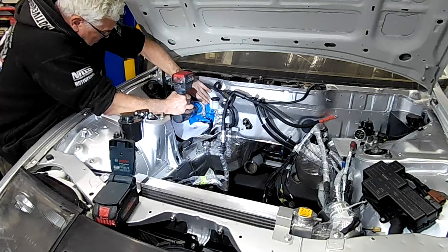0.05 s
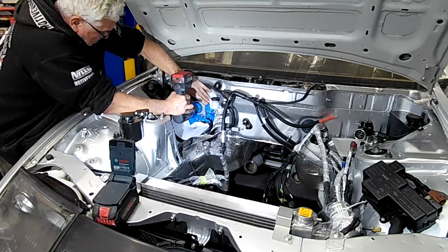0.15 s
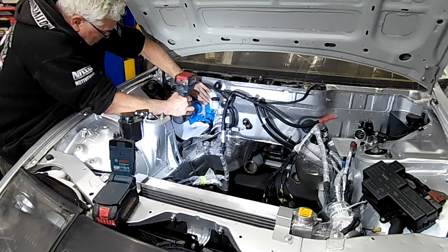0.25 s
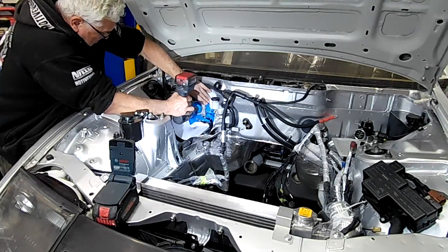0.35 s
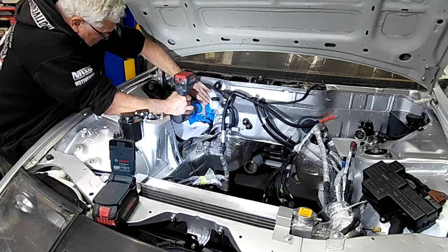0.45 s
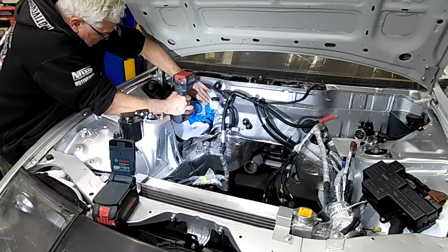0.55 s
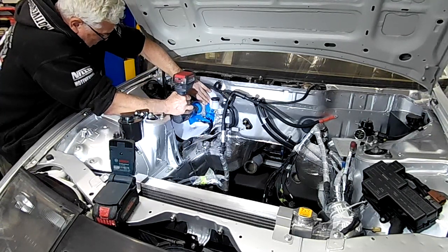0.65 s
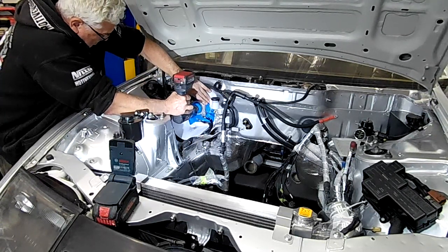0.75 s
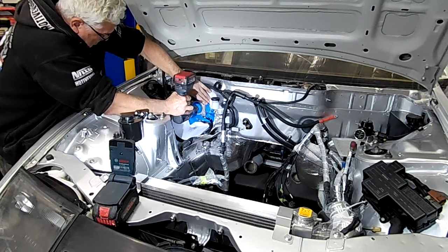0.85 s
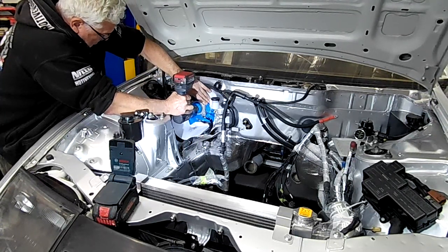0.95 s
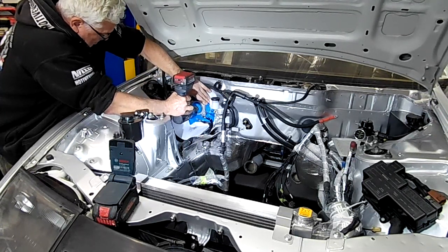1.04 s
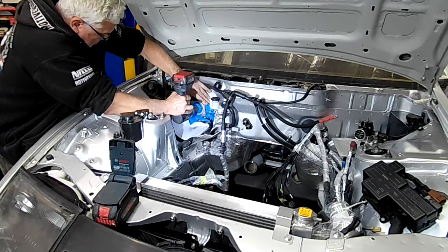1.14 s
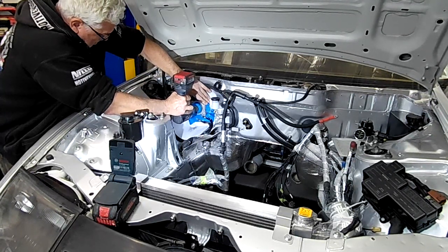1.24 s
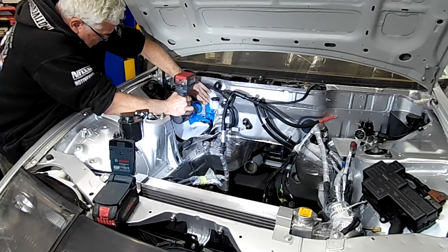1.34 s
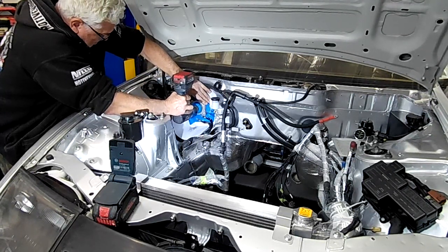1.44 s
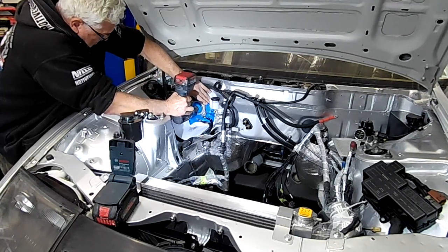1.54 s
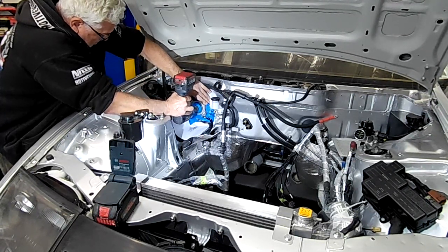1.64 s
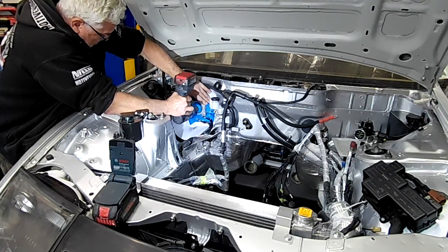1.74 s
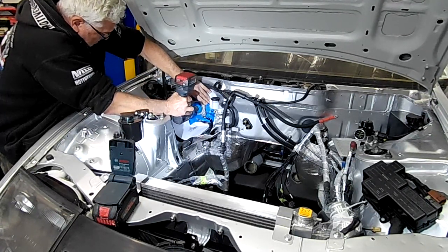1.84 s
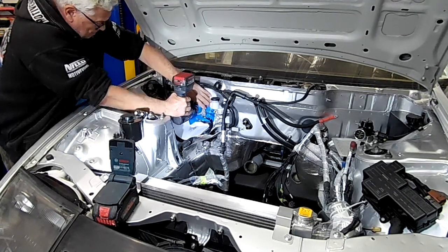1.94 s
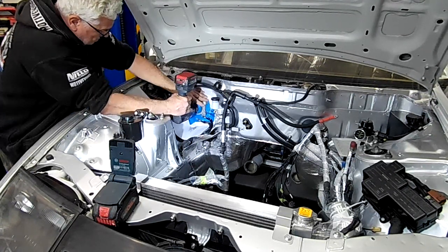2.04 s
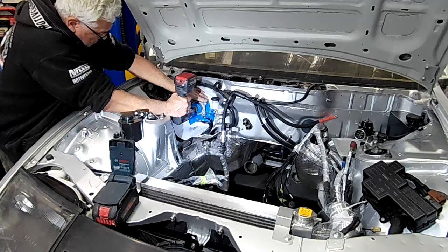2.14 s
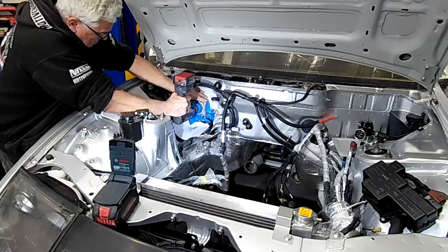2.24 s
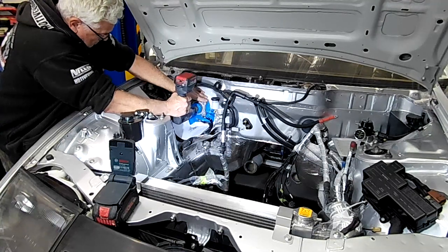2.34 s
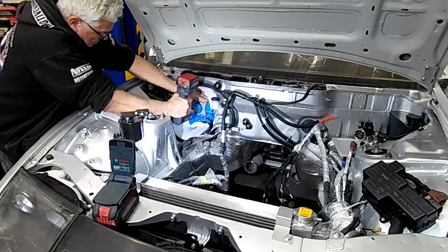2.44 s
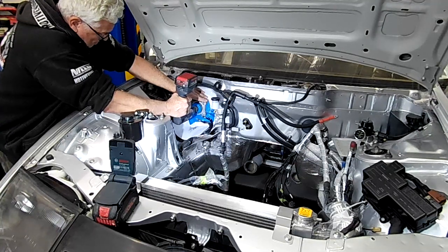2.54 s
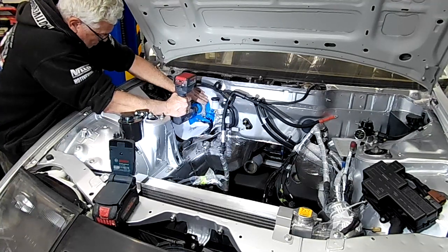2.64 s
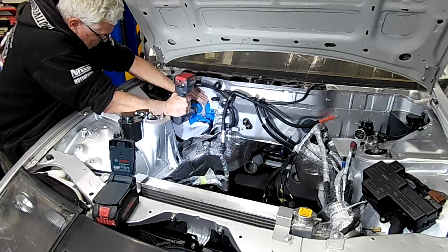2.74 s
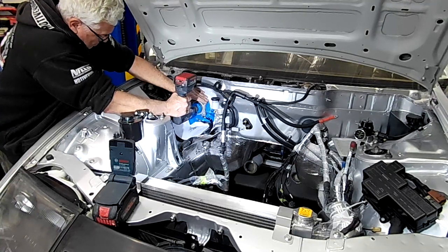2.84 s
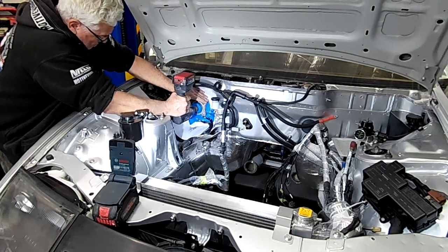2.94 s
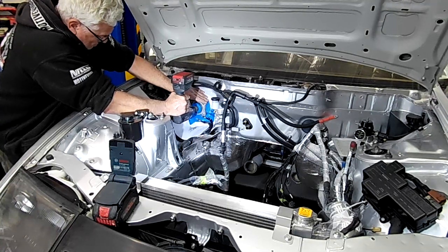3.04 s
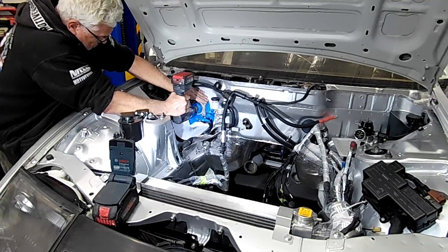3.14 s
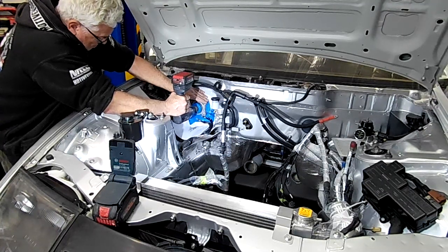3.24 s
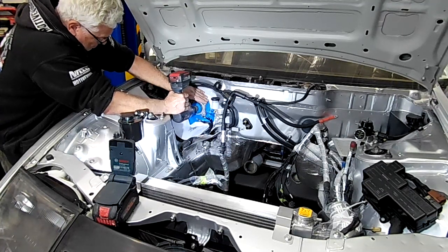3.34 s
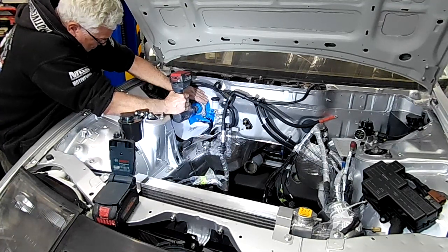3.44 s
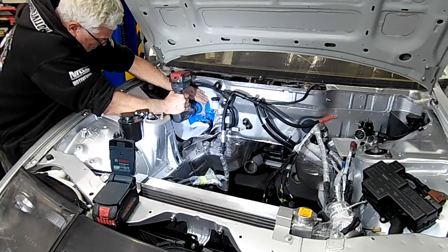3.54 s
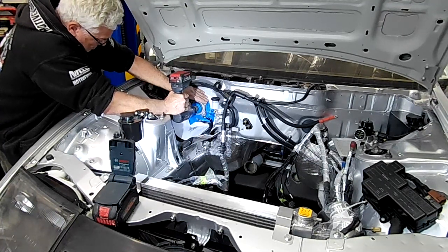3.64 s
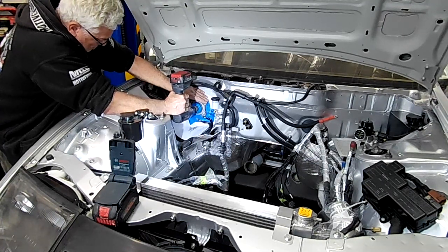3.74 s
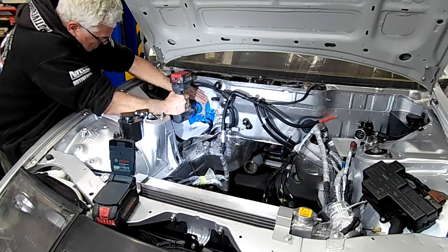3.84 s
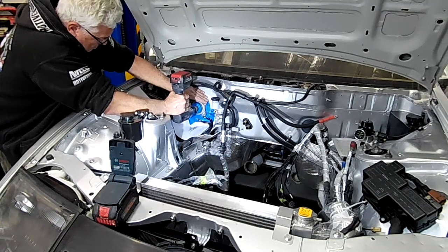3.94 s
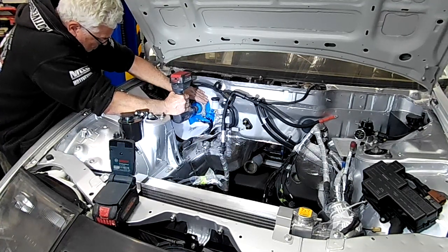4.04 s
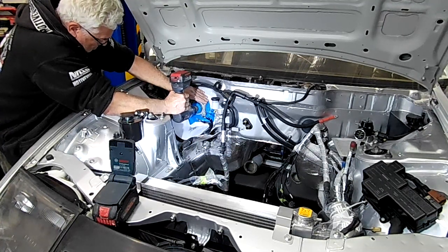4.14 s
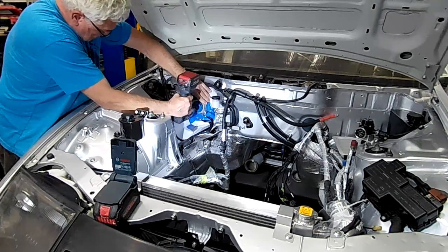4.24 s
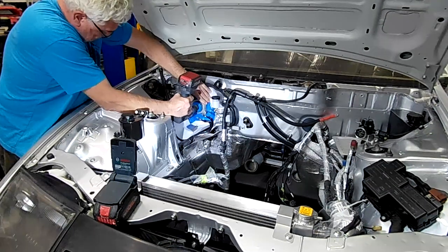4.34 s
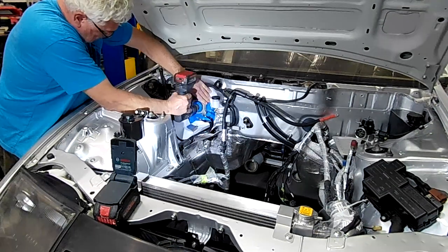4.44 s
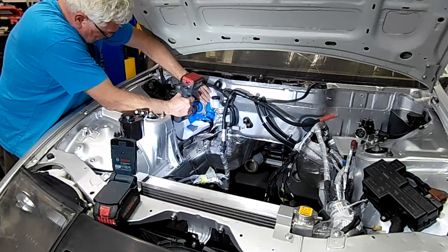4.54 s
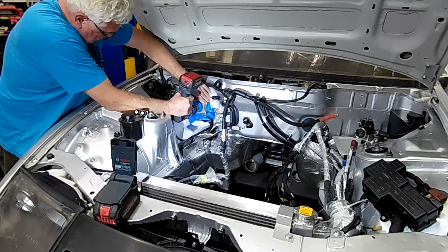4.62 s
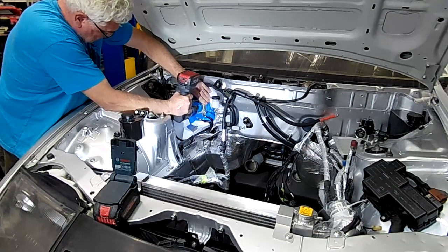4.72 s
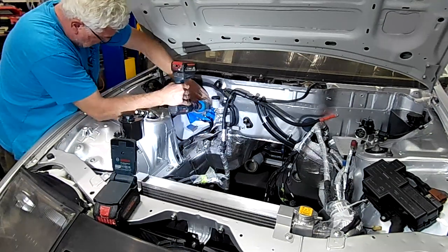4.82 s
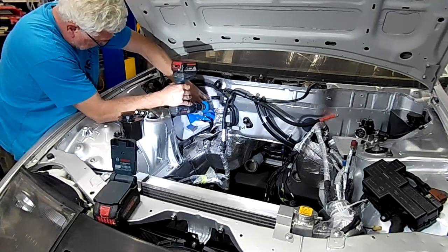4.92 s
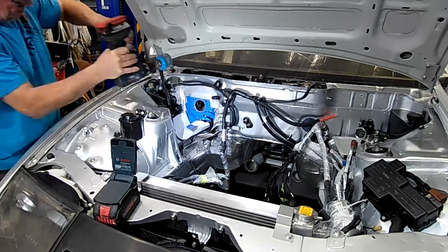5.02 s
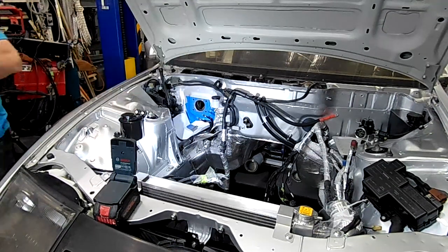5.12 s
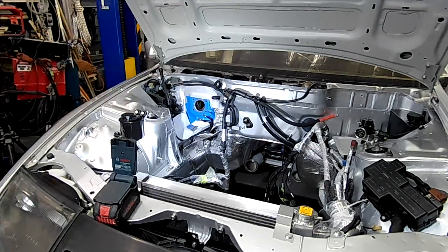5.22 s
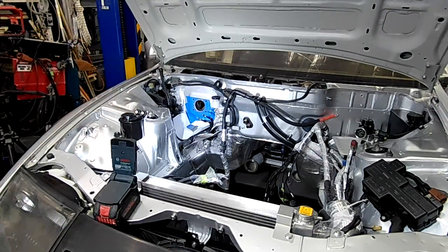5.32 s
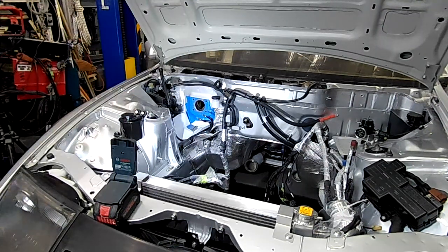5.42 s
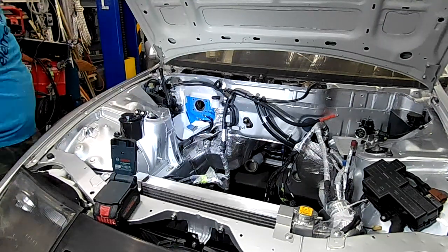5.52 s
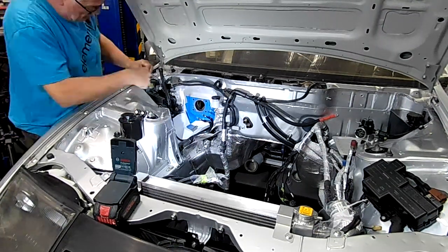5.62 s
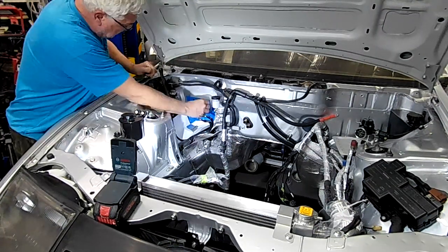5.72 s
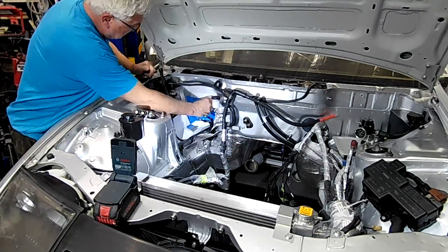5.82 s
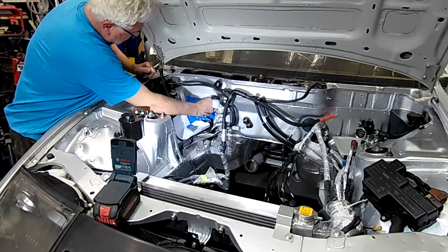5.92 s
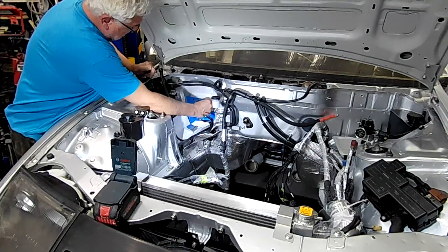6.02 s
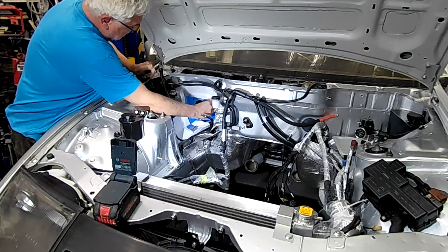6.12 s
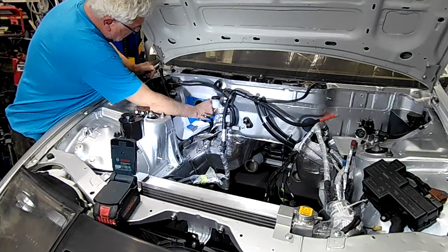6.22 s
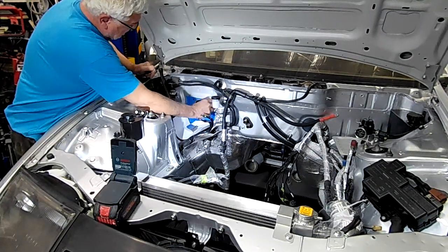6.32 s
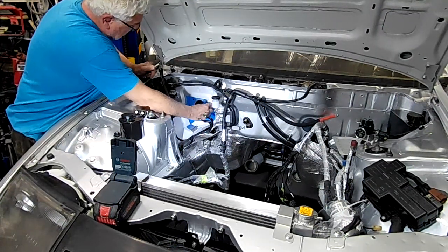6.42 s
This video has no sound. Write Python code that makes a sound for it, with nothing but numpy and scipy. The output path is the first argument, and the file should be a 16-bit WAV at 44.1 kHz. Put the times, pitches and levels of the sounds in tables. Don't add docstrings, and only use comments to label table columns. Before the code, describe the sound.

Harsh, rattling metal cutting from a hand drill stops, restarts with a brief squeal, breaks through in jerks, and gives way to faint clicks.

```python
import sys
import numpy as np
from scipy import signal
from scipy.io import wavfile
from scipy.ndimage import uniform_filter1d

SR = 44100
rng = np.random.default_rng(int(sys.argv[2]) if len(sys.argv) > 2 else 0)


def volts(x):
    e = np.asarray(x, float) / 20
    return 10 ** e


def wav_record(signal):
    frames = np.transpose(np.atleast_2d(signal))
    bounded = np.clip(frames, -1, 1)
    quanta = np.round(bounded * 32767).astype(np.int16)
    wavfile.write(sys.argv[1], SR, quanta)


N = 285322

# [t/s, effort level/dB, bite level/dB (shriek of the teeth)]
BURSTS = [
    [(0.0, -38, -6), (0.096, -40.5, -.5), (0.29, -34, -6.5), (0.434, -39.5, -3), (0.5, -37.5, -4.5),
     (0.98, -38.5, .3), (1.488, -39, 2), (1.902, -41, 4.3), (1.921, -52, -2)],
    [(2.138, -54, 2.2), (2.16, -45.5, 2.2), (2.398, -39.5, -1), (2.451, -44, 2)],
    [(2.449, -66, 2.2), (2.462, -46, -4), (2.474, -43.5, 3), (2.86, -39, -.6), (2.968, -40.5, .4),
     (3.34, -39, -2.5)],
    [(3.33, -42, -.9), (3.414, -38.5, -5), (3.79, -39.5, -.2), (4.188, -36, -5), (4.236, -40, -2.2),
     (4.249, -58, -2.2)],
    [(4.326, -50.5, 1.2), (4.476, -51.5, 4), (4.774, -53, 4.5), (4.838, -60, 3)],
    [(4.937, -50, -1.5), (4.943, -40, -1.5), (4.956, -63, 10.5)],
    [(4.953, -56, 7), (4.973, -46.5, 1.2), (4.99, -73, 1.2)],
]
CONTACTS = [0, 1, 1, 2, 3, 3, 3]
# [t/s, speed/turns per second]
SAW_SPEED = [(0, 53.3), (.4, 54.6), (1, 53), (1.52, 53.6), (1.58, 47), (1.72, 43.5), (1.93, 43), (2.14, 56),
             (2.5, 53), (2.8, 52.4), (3.3, 53.5), (3.6, 53.2), (3.85, 52.3), (4.25, 52.3), (4.4, 56)]
PART_EDGES = [450, 1600, 6800, 10000, 17000]
# [drum level/dB, panel level/dB, cup level/dB, teeth level/dB]
PART_LEVELS = [(-20, 0, 1.2, 0), (-15.5, 0, 1.5, 0), (-15.5, 0, 1.1, 0), (-21, 0, -.6, 0)]
BITE_FOLLOW = [.1, 0, .7, 1]
REPEAT_SHARE = [0.6, 0.48, 0.085, 0.26]
BITE_DEPTH = [.6, 1.05, .9, .9]
# [t/s, level/dB under the effort, f/Hz, length/s]
BOOMS = [
    (.17, -29, 350, .28),
    (.05, -24, 930, .33),
    (3.15, -26, 630, .2),
    (1.0, -31, 800, .92),
    (2.15, -18, 1020, .3),
    (3.32, -20.5, 790, .57),
    (4.13, -20, 900, .12),
]
# [multiple of saw speed, level/dB under the panel in each of four contacts]
GEAR_TONES = [(12, -41, -41, -38, -45), (14, -43, -41, -35, -45), (16, -42, -41, -31, -45),
              (25, -39, -26, -33, -40), (36, -22, -22, -30, -35), (38, -24.5, -16, -22, -26),
              (40, -21, -20, -29, -36), (42, -23.5, -19, -20, -35), (52, -23.5, -14, -29, -35),
              (58, -21, -22, -22, -30)]
# [multiple of saw speed, level/dB under the effort]
GEAR_SONG = [(25, -29), (40, -18), (42, -12), (54, -14), (55, -18), (60, -17), (68, -20), (73, -19),
             (74, -13), (78, -18), (82, -12), (83, -18)]


def cutting(rows, contact):
    s, t, (effort_db, bite_db) = columns(rows)
    count = len(t)
    levels_db = [effort_db + part_db + follow * bite_db
                 for part_db, follow in zip(PART_LEVELS[contact], BITE_FOLLOW)]
    turns = np.cumsum(np.interp(t, *np.transpose(SAW_SPEED))) / SR

    tick_size = volts(4.64 * np.minimum(rng.exponential(1, count), 3.4))
    ticks = tick_size * (rng.random(count) < 3000 / SR)
    ticks = evened(ticks * rng.choice([-1, 1], count))
    chips = evened(rng.standard_normal(count) + 0.45 * ticks)
    fresh = panel(chips, contact)
    again = panel(repeating(turns, memory=0.86), contact)

    out = np.zeros(count)
    for lo, hi, db, share in zip(PART_EDGES, PART_EDGES[1:], levels_db, REPEAT_SHARE):
        rung = band(np.sqrt(1 - share) * fresh + np.sqrt(share) * again, lo, hi)
        bitten = rung * bites(turns, rng.uniform(0, 0.15)) ** BITE_DEPTH[contact]
        out += volts(db + 0.89 * slow(count, 29.94)) * evened(bitten)

    boom_rise_s, boom_width = 0.06, 1.27
    for start, db, hz, length in BOOMS:
        swell = np.clip(np.minimum(t - start, start + length - t) / boom_rise_s, 0, 1)
        boom = evened(band(fresh + again, hz / boom_width, hz * boom_width, order=2))
        out += volts(effort_db + db) * swell * boom

    for multiple, *dbs in GEAR_TONES:
        waver_db = 2.5 * slow(count, 4)
        out += volts(levels_db[1] + dbs[contact] + waver_db) * np.sin(2 * np.pi * multiple * turns)

    sing_from_s, sing_to_s, sing_rise_s = 3.76, 4.3, 0.12
    sings = np.clip(np.minimum(t - sing_from_s, sing_to_s - t) / sing_rise_s, 0, 1)
    if sings.any():
        for multiple, db in GEAR_SONG:
            level = sings * volts(effort_db + db + 2.6 * slow(count, 7))
            out += level * np.sin(2 * np.pi * (multiple * turns + rng.random()))

    shake = evened(band(rng.standard_normal(count), 22, 90, order=2))
    out += volts(effort_db - 54 + 4 * slow(count, 9)) * shake
    edge = np.minimum(np.minimum(t - t[0] + (s == 0), t[-1] - t) / 0.012, 1)
    return s, patchy(out, patchy_db=1.5) * np.sin(np.pi / 2 * edge)


def bites(turns, lead):
    halves = 2 * (turns + lead)
    whole = halves.astype(int)
    bite_db = 2 * np.clip(rng.standard_normal(whole[-1] + 1), -2, 1.4)[whole] - 9.2 * (whole % 2)
    curl = volts(1.43 * slow(len(turns), 220))
    return curl * (1.38 + volts(bite_db) * np.exp(-((halves % 1 - 0.45) / 0.22) ** 2))


def repeating(turns, memory):
    burrs = rng.standard_normal((int(turns[-1]) + 40, 800))
    worn = signal.lfilter([1], [1, -memory], burrs, axis=0)[30:]
    return evened(worn.ravel()[(turns * 800).astype(int)])


# [f/Hz, width/Hz, level/dB in each of four contacts]
PANEL_MODES = [(647, 110, -20, -27, -19, -23), (847, 140, -24, -22, -17, -24),
               (1299, 134, -12.5, -13.5, -4, -17), (1958, 136, -4, -7, -9.5, -5.5),
               (2077, 62, -4, -19, -6, -23), (2457, 115, -6.5, -9, -6.5, -21),
               (2840, 440, -2, -2.5, -4, -3.5), (3070, 150, 3.5, -1.5, 0, 3),
               (3574, 118, -2, -17.5, -6.5, -10.5), (3840, 110.5, -4.5, -8.5, -2, -10.5),
               (4372, 410, -4, -8, -3, -8), (5166, 250, -5, -5, -6.5, -11.5),
               (5876, 400, -9, -7, -10, -10.5)]
# [f/Hz, width/Hz, level/dB in each of four contacts]
CUP_MODES = [(6550, 240, -15.5, -14.5, -15.5, -13), (7720, 410, 2.5, -4.5, -5, -7),
             (8340, 300, -3.5, -6.5, -7, -14), (8750, 300, 3.5, -2.5, -6.5, -11),
             (9310, 266, -1.5, -8, -4, -7.5), (10540, 290, -5, 0, -1.5, -4.5),
             (11170, 260, -5.5, -3, -4.5, -2.5), (11890, 650, -11.5, 0, -1.5, -4),
             (12400, 400, -5, -4, -5, -1), (13600, 387, -11.5, -7.5, -4, -3), (14700, 480, -6, 1, -1, -.5),
             (15700, 660, -11.5, -4.5, -4, -9)]
# [f/Hz, level/dB]
BETWEEN_MODES = [(300, -55), (600, -31.5), (1500, -16.5), (2300, -13.5), (3340, -16), (6500, -18),
                 (10000, -9.5), (14000, -15)]


def panel(x, contact):
    modes = [(hz, width, dbs[contact]) for hz, width, *dbs in PANEL_MODES + CUP_MODES]
    return body(x, BETWEEN_MODES, modes)


def patchy(x, patchy_db):
    z = signal.stft(x, nperseg=512, noverlap=384)[2]
    patches = rng.standard_normal(z.T.shape).T
    patches = uniform_filter1d(patches, size=4, axis=0)
    patches = evened(uniform_filter1d(patches, size=30, axis=1))
    return signal.istft(z * volts(patchy_db * patches), nperseg=512, noverlap=384)[1][:len(x)]


# [t/s, peak level/dB, ring f/Hz]
SNAGS = [(0.5577, -28, 8890), (0.5931, -28, 8850), (0.6141, -27, 8800), (0.632, -25, 8220),
         (0.6689, -24, 8230), (0.6874, -26, 8650), (0.7054, -24, 8780), (0.7248, -20, 8820),
         (0.7433, -21, 8600), (0.7622, -17, 8740), (0.7812, -24, 7450), (0.8041, -26, 8620),
         (0.8755, -23, 9310), (0.9164, -25, 8760), (0.9318, -13, 8210), (0.9643, -21, 8660),
         (0.9787, -16, 8550), (1.0536, -16, 8560), (1.092, -25, 7400), (1.1104, -26, 7760),
         (1.1294, -28, 8780), (1.1718, -25, 8730), (1.2037, -23, 7790), (1.2232, -17, 8520),
         (1.2796, -22, 7500), (1.298, -18, 7760), (1.317, -23, 8850), (1.3359, -18, 7800),
         (1.3544, -19, 8110), (1.3738, -19, 8890), (1.3918, -17, 8750), (1.4103, -21, 8770),
         (1.4287, -21, 7760), (1.4477, -21, 7780), (1.4661, -15, 8530), (1.4851, -26, 7740),
         (1.5035, -14, 7890), (1.525, -20, 7760), (1.547, -22, 7760), (1.5664, -27, 8870),
         (1.5879, -18, 8600), (1.6098, -23, 8610), (1.6313, -23, 8620), (1.6956, -26, 7500),
         (1.7385, -19, 8590), (1.762, -20, 8900), (1.7859, -20, 8580), (1.8168, -28, 9370),
         (1.8363, -23, 8880), (1.8582, -27, 8910), (1.8822, -27, 8740),
         (.103, -26, 8860),
    (.122, -24, 7780),
    (3.867, -27, 8100),
    (3.93, -25, 9300),
    (3.945, -28, 8200),
    (3.964, -26, 8200),
    (4.005, -26, 9400),
    (4.17, -21, 8300),
]
PING_MODES = [7450, 7780, 8200, 8560, 8860, 9320]


def snag(s, db, hz):
    t = np.arange(900) / SR
    spread_hz, rise_s, t60_s = 900, 0.0008, 0.013
    overtone_db = -5 + 0.5 * db + 2 * rng.standard_normal()
    modes = np.array(PING_MODES)[:, None]
    phases = 2 * np.pi * rng.random((len(PING_MODES), 1))
    nearness = np.exp(-((modes - hz) / spread_hz) ** 2)
    tones = np.cos(2 * np.pi * modes * (t - 2 * rise_s) + 0.45 * phases)
    chord = evened((nearness * tones).sum(0))
    decay = volts(-60 * t / t60_s) + 0.08 * volts(-60 * t / 0.029)
    ping = chord * (1 - np.exp(-(t / rise_s) ** 2)) * decay
    over = evened(band(rng.standard_normal(len(t)), 13600, 16200, order=1))
    over = over * (t / 0.0008) * np.exp(-t / 0.0013)
    return s, volts(db) * (0.88 * ping + volts(overtone_db) * over)


# [t/s, peak level/dB, f/Hz, length/s]
RUBS = [(0.127, -23, 12600, 0.012), (0.149, -20.5, 12600, 0.011), (.175, -23, 13500, 0.01),
        (0.193, -23, 12000, .014), (.22, -24, 10400, 0.0082), (0.225, -17.5, 12400, 0.037),
        (0.266, -19, 12800, 0.018), (0.282, -20.5, 12200, 0.048), (0.325, -20, 12400, 0.013),
        (0.345, -23, 11500, 0.016), (.373, -21, 12600, 0.013), (.393, -21, 12000, 0.0088),
        (.49, -30, 4000, .035), (.94, -23, 13000, .008), (.96, -19, 12000, .01), (.962, -29, 1900, .012),
        (1.111, -23, 14300, .01), (1.892, -24, 12500, .008), (2.154, -29, 10800, .007),
        (2.264, -26, 11500, .007), (2.283, -24, 11500, .007), (2.382, -21.5, 13200, 0.06),
        (2.383, -41, 785, 0.032), (5.346, -52, 810, 0.02)]
# [t/s, peak level/dB, f/Hz, length/s]
BRUSHES = [(2.034, -52, 11500, 0.056), (2.065, -58, 3000, .03), (5.64, -62, 14300, .06),
           (2.048, -60, 7800, .05), (4.887, -58, 8000, .06), (4.89, -53, 14200, .055),
           (5.4, -66, 10000, 0.028), (5.542, -55, 8900, 0.06), (5.543, -59, 14100, 0.049),
           (5.549, -61, 5600, 0.046), (5.677, -66, 11000, .035), (5.714, -64, 6200, 0.067),
           (5.72, -64, 13000, .05), (6.09, -65, 9000, .04)]


def rub(s, db, hz, length):
    count = round(length * SR)
    slips = np.cumsum(372 * (1 + 0.06 * slow(count, 90))) / SR % 1
    chatter = volts(7.5 * (db > -35) * np.exp(-slips / 0.22))
    grit = rng.standard_normal(count) * volts(2 * np.minimum(rng.exponential(1, count), 4))
    scrape = evened(band(grit * chatter, 0.79 * hz, 1.2 * hz))
    return s, volts(db - 11.5) * scrape * signal.windows.tukey(count, 0.7)


# [t/s, peak level/dB, length/s, cup f/Hz]
LURCHES = [(4.4134, -38, 0.014, 7500), (4.442, -39, 0.0096, 4300), (4.453, -35, 0.015, 9000),
           (4.471, -31, 0.012, 4400), (4.4945, -17.5, 0.012, 10300), (4.5176, -24, 0.013, 8800),
           (4.537, -23, 0.012, 7200), (4.5586, -27, 0.0065, 6400), (4.5756, -33, 0.0057, 6700),
           (4.592, -38, .006, 9000), (4.611, -38, 0.0075, 7500), (4.627, -27, 0.008, 11500),
           (4.643, -26, 0.009, 9000), (4.679, -26, 0.007, 9600), (4.7175, -35, 0.0063, 6000),
           (4.7453, -26, 0.018, 7500), (4.7684, -33, 0.007, 3900), (4.7794, -32, 0.006, 9000)]


def lurch(s, db, length, hz):
    count = round(length * SR)
    push = rng.standard_normal(count) * np.hanning(count)
    rung = panel(np.append(push, np.zeros(600)), CONTACTS[-1])
    cup = evened(band(rung, 0.84 * hz, 1.18 * hz, order=2))
    sheet = evened(band(rung, 1250, 3700, order=2))
    sheet_db = 0.47 * (-35 - db)
    return s - 0.002, volts(db - 19.5) * (volts(sheet_db) * sheet + cup)


# [t/s, f/Hz, level/dB]
SQUEAL = [
    (2.375, 2890, -50),
    (2.419, 2730, -37.5),
    (2.44, 2630, -66),
]
# [t/s, f/Hz, level/dB]
WHINE = [
    (4.33, 14400, -62),
    (4.885, 14200, -71),
]


def whistle(rows, waver, waver_hz):
    s, t, (hz, db) = columns(rows)
    turns = np.cumsum(hz * (1 + waver * slow(len(t), waver_hz))) / SR
    level = volts(db + 2.5 + 2.9 * slow(len(t), 60))
    return s, level * np.sin(2 * np.pi * turns) * signal.windows.tukey(len(t), 0.2)


# [t/s, peak level/dB, f/Hz, brightness level/dB]
CLICKS = [(1.9733, -46.5, 3100, -9), (1.9884, -54, 2000, -3), (2, -53, 4000, -3), (2.0362, -41, 3220, -17),
          (2.1265, -45, 3080, 0), (4.255, -53, 6000, -3), (4.2785, -42.5, 2010, -22),
          (4.2884, -47, 3070, -18), (4.3001, -44, 3080, 2), (4.8788, -54, 5000, 0),
          (5.0464, -54, 2890, -21), (5.0584, -57, 2710, -15), (5.098, -62, 14500, 4), (5.14, -60, 14000, 3),
          (5.2016, -62, 6000, -4), (5.218, -61, 7000, 0), (5.256, -49, 2700, -7), (5.317, -44.5, 9730, 2),
          (5.351, -39, 12000, 0), (5.494, -50, 3300, -16), (5.547, -56, 14500, 3), (6.0417, -59, 10500, -1),
          (6.1134, -60, 8330, -6), (6.155, -62, 13000, 2), (6.33, -62, 12000, 1), (6.37, -62, 7500, 0)]


def click(s, db, hz, bright_db):
    t = np.arange(2500) / SR
    t60_s = 0.028 + 0.0004 * (db + 36)
    crack = rng.standard_normal(len(t))
    tinted = evened(band(crack, 1300, 10400, order=2))
    tinted = tinted + 1.06 * evened(band(crack, 0.84 * hz, 1.2 * hz, order=1))
    bright = volts(bright_db) * evened(band(crack, 7200, 17500, order=2))
    knock = volts(0.78 * (db + 30)) * evened(band(crack, 600, 3100, order=2))
    envelope = (1 - np.exp(-t / 0.0013)) * volts(-60 * t / t60_s)
    return s, volts(db - 7) * (tinted + bright + knock) * envelope


# [t/s, level/dB, f/Hz]
THUDS = [
    (.97, -72, 150),
    (1.78, -69, 220),
    (3.409, -68, 220),
    (3.939, -74, 170),
    (6.051, -73.5, 150),
]


def thud(s, db, hz):
    push = rng.standard_normal(1800) * np.hanning(1800)
    return s, volts(db) * evened(band(push, 0.5 * hz, 2.6 * hz, order=2))


# [t/s, level/dB]
RUSTLES = [
    [(1.92, -73), (2.03, -74), (2.09, -74), (2.14, -77)],
    [(4.25, -84), (4.33, -66.5)],
    [(4.83, -80), (4.876, -81), (4.9, -70), (4.93, -69), (4.984, -77.5), (6.112, -76), (6.47, -77)],
]
# [f/Hz, level/dB per Hz]
RUSTLE_COLOUR = [(1200, -23), (2000, -6.5), (3900, -8.5), (5900, -12), (9000, -11), (12000, -13.5),
                 (14500, -10.5), (16200, -14)]


def rustle(rows):
    s, t, (db,) = columns(rows)
    grains = rng.standard_normal(len(t)) * volts(1.8 * slow(len(t), 42))
    return s, volts(db) * evened(patchy(body(grains, RUSTLE_COLOUR), patchy_db=2.4))


# [t/s, air level/dB, machine hum level/dB]
ROOM = [(0.0, -70, -77), (0.32, -68, -65), (0.55, -75, -71), (1.75, -70, -71), (1.91, -70, -95),
        (2.2, -76, -90), (2.4, -74, -70), (4.0, -78, -72), (4.5, -73.5, -72), (5.08, -73.5, -68),
        (6.47, -74.5, -69)]
# [f/Hz, level/dB per Hz]
AIR_COLOUR = [(15, -59), (25, -29), (300, -5.5), (540, -10), (1400, -10.5), (1620, -17), (6000, -33.5),
              (9000, -90)]
# [f/Hz, level/dB]
HUM_LINES = [(370, -10), (740, -15), (899, -15), (1110, 0.5), (1480, -7.5)]


def shop():
    s, *levels = np.transpose(ROOM)
    air_db, hum_db = (np.interp(np.arange(N) / SR, s, level) for level in levels)
    air = evened(body(rng.standard_normal(N), AIR_COLOUR))
    air = volts(air_db + 2.5 + 1.3 * slow(N, 7)) * air
    shudder = evened(band(rng.standard_normal(N), 50, 180, order=2))
    shudder = volts(-92 + 2.5 * slow(N, 20)) * shudder
    waver = 1 + 0.0015 * slow(N, 30)
    hum = np.zeros(N)
    for hz, db in HUM_LINES:
        hum += volts(db + 0.91 * slow(N, 23)) * np.sin(2 * np.pi * np.cumsum(hz * waver) / SR)
    return air + shudder + volts(hum_db + 0.5) * hum


def body(x, colour, modes=()):
    hz = abs(np.fft.fftfreq(8192, 1 / SR))
    power = volts(read(colour, hz)) ** 2
    for mode_hz, width, db in modes:
        power = power + volts(db) ** 2 / (1 + (2 * (hz - mode_hz) / width) ** 2) ** 1.46
    log_gain = np.log(power + 1e-10) / 2
    taps = np.fft.ifft(np.exp(np.conj(signal.hilbert(log_gain)))).real[:4096]
    return signal.oaconvolve(x, taps)[:len(x)]


def band(x, lo_hz, hi_hz, order=3):
    edges = [lo_hz, min(hi_hz, 21000)]
    return signal.sosfilt(signal.butter(order, edges, "band", fs=SR, output="sos"), x)


def slow(length, hz):
    lowpass = signal.butter(2, hz, fs=SR, output="sos")
    return evened(signal.sosfilt(lowpass, rng.standard_normal(length + 4000))[4000:])


def evened(x):
    return x / np.sqrt(np.mean(x ** 2) + 1e-20)


def read(points, hz):
    f, value = np.transpose(points)
    return np.interp(np.log(hz + 1), np.log(f + 1), value)


def columns(rows):
    s, *cols = np.transpose(rows)
    t = np.arange(s[0], s[-1], 1 / SR)
    return s[0], t, [np.interp(t, s, c) for c in cols]


def add(mix, s, sound):
    part = mix[max(round(s * SR), 0):][:len(sound)]
    part += sound[:len(part)]


def gate(x, floor_db, from_hz):
    hz, _, z = signal.stft(x, SR, nperseg=1024)
    blocks = abs(z[:512].reshape(32, 16, -1)) ** 2
    power = uniform_filter1d(blocks.mean(1), size=3, axis=1)
    quiet = np.repeat(10 * np.log10(power + 1e-20) < floor_db, 16, axis=0)
    quiet = np.vstack([quiet, quiet[-1:]])
    keep = np.where(quiet & (hz[:, None] > from_hz), volts(-20), 1)
    return signal.istft(z * keep, SR, nperseg=1024)[1][:len(x)]


def scene():
    mix = shop()
    for rows, contact in zip(BURSTS, CONTACTS):
        add(mix, *cutting(rows, contact))
    events = ((snag, SNAGS), (rub, RUBS + BRUSHES), (lurch, LURCHES), (click, CLICKS), (thud, THUDS))
    for source, table in events:
        for row in table:
            add(mix, *source(*row))
    for rows in RUSTLES:
        add(mix, *rustle(rows))
    add(mix, *whistle(SQUEAL, waver=0.0091, waver_hz=60))
    add(mix, *whistle(WHINE, waver=0.0073, waver_hz=200))
    return np.array([mix, mix])


def top_cut(x):
    return signal.sosfilt(signal.butter(12, 16970, fs=SR, output="sos"), x)


def record(dry):
    gated = gate(dry[0], floor_db=-108.5, from_hz=12000)
    lowpass = signal.firwin(401, 15850, window=("kaiser", 6), fs=SR)
    limited = signal.oaconvolve(gated, lowpass, "same")
    return top_cut(np.array([limited, limited]))


dry = scene()
out = record(dry)
wav_record(out)
```